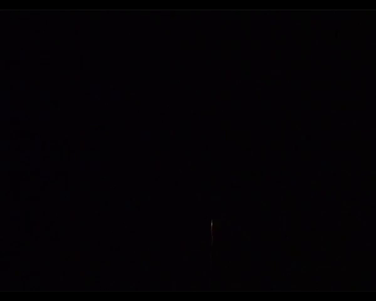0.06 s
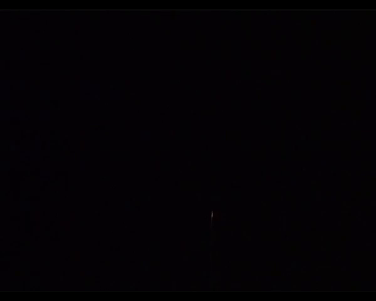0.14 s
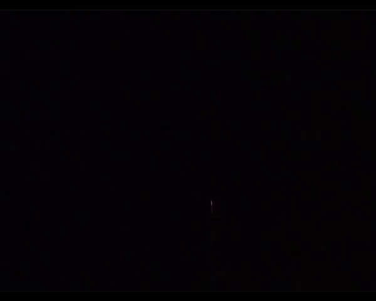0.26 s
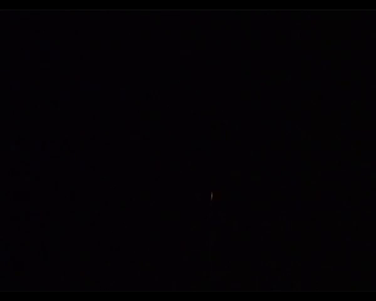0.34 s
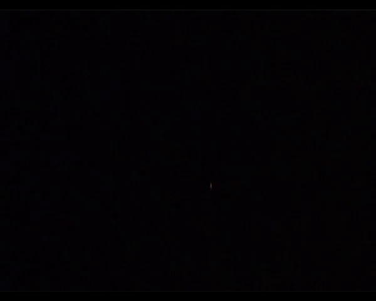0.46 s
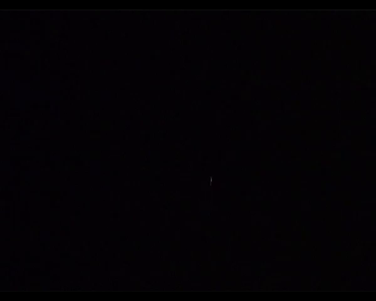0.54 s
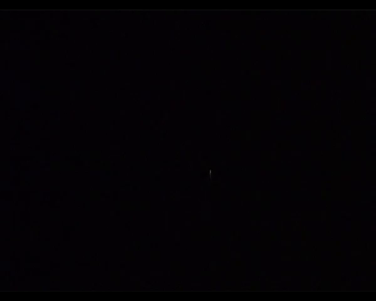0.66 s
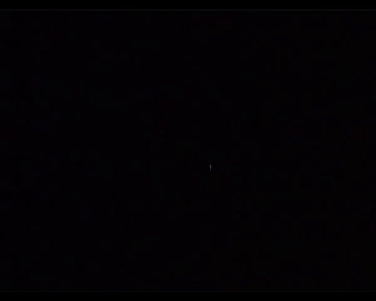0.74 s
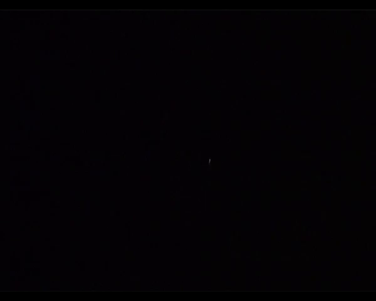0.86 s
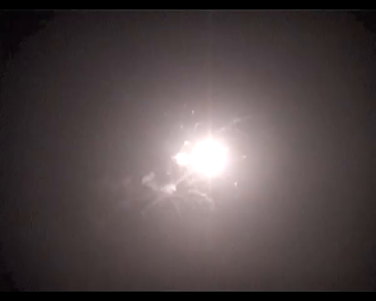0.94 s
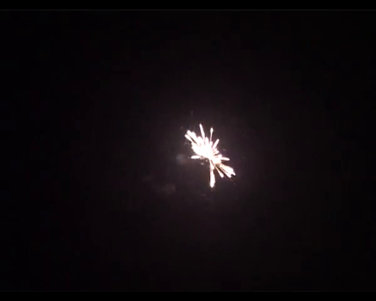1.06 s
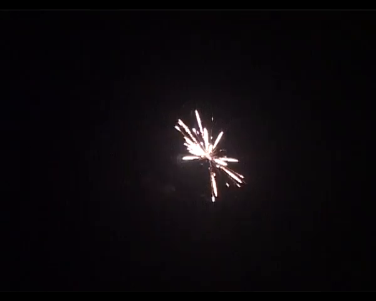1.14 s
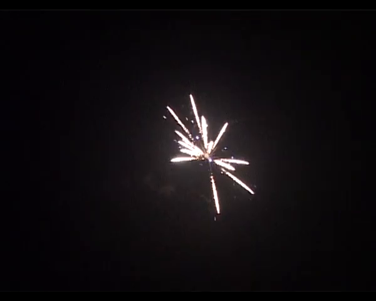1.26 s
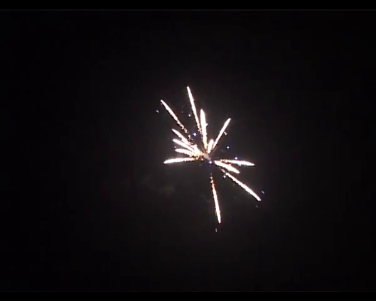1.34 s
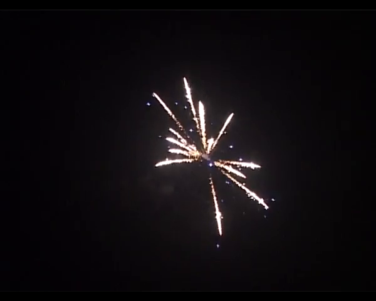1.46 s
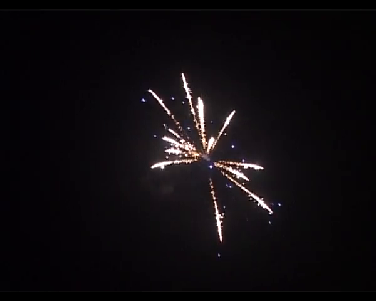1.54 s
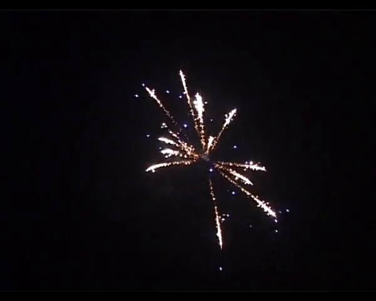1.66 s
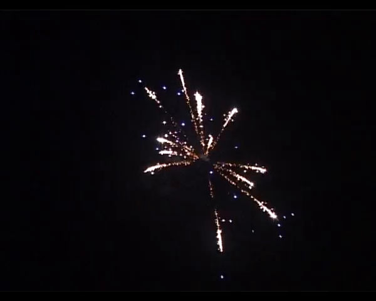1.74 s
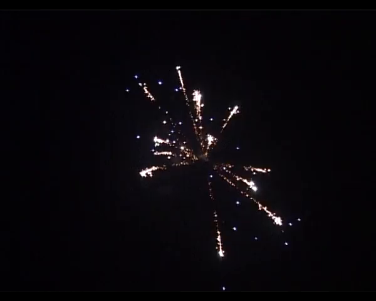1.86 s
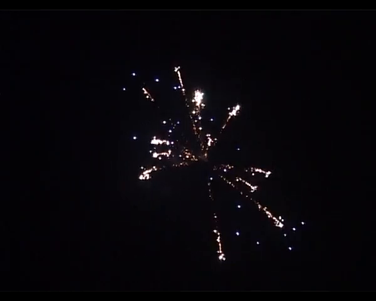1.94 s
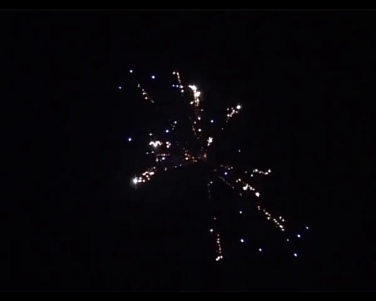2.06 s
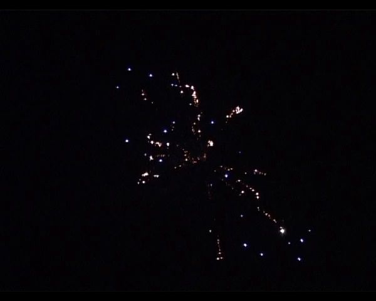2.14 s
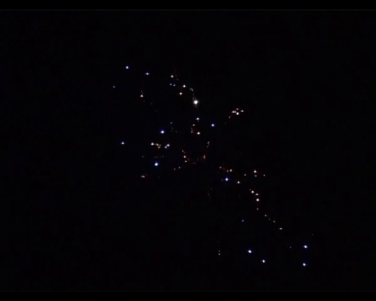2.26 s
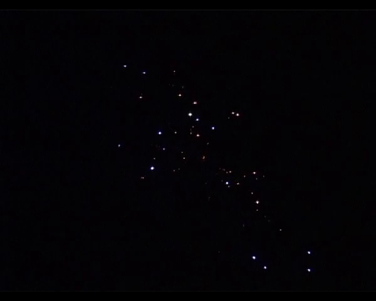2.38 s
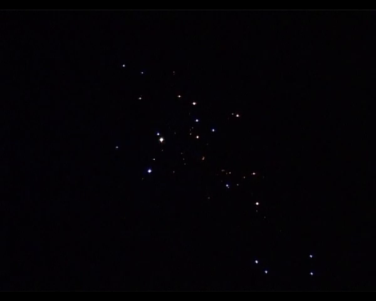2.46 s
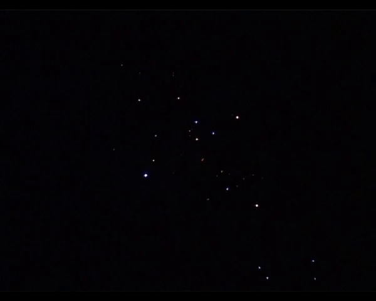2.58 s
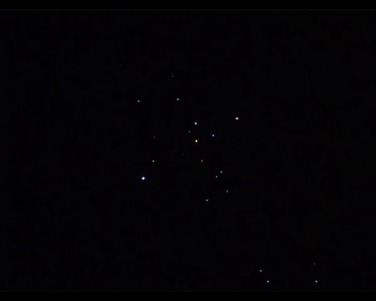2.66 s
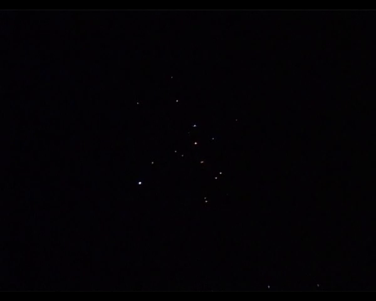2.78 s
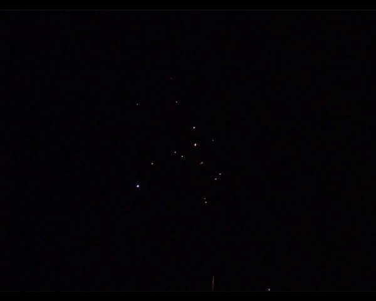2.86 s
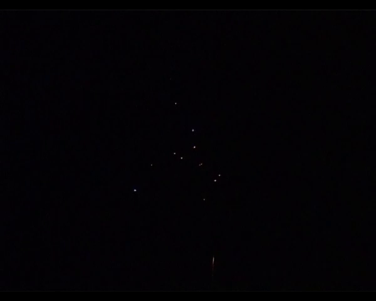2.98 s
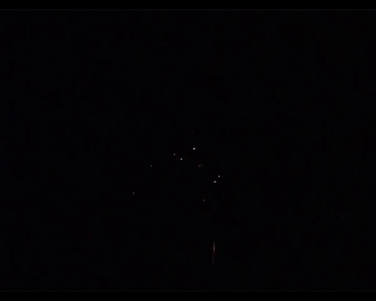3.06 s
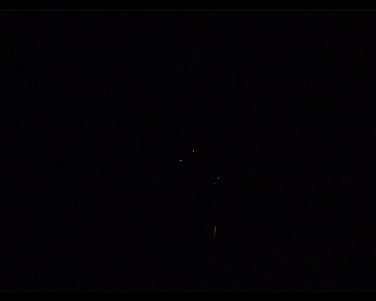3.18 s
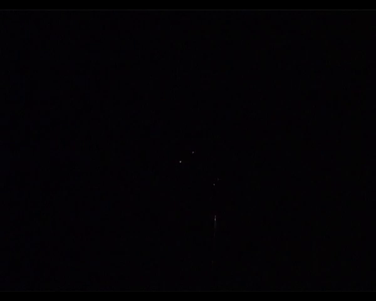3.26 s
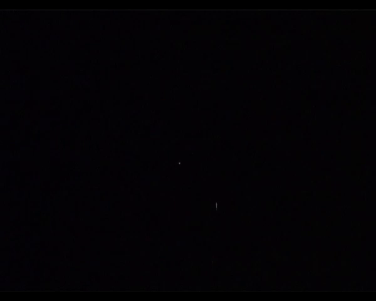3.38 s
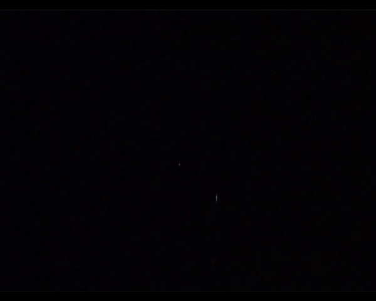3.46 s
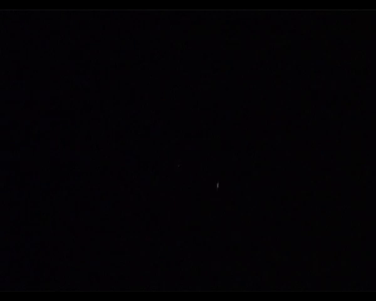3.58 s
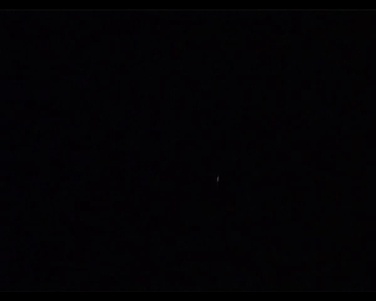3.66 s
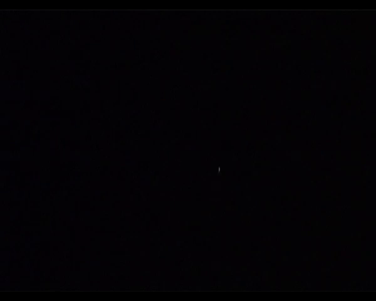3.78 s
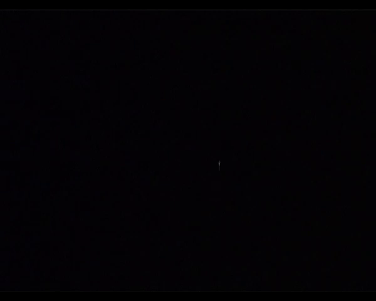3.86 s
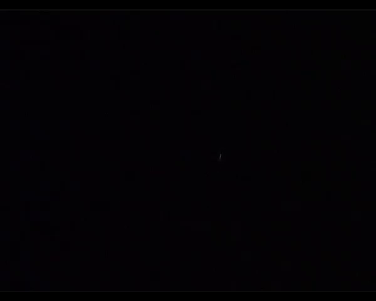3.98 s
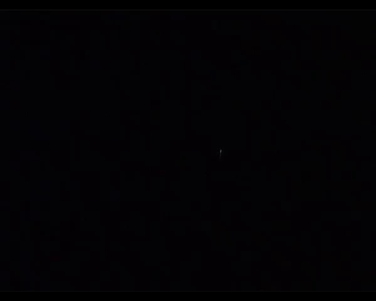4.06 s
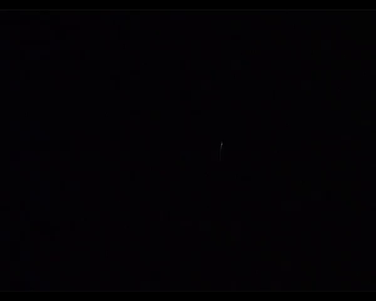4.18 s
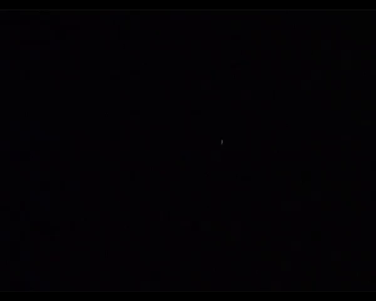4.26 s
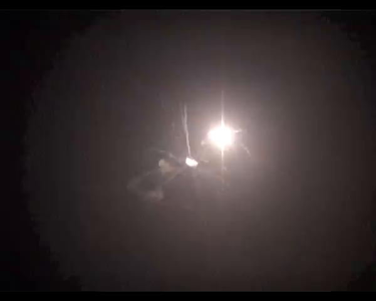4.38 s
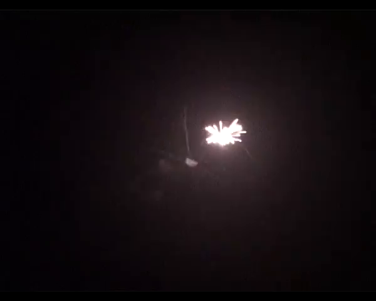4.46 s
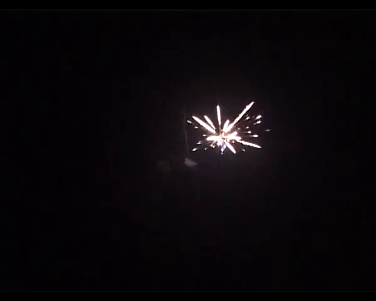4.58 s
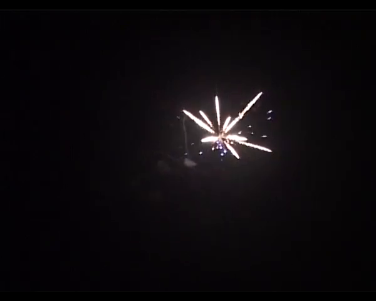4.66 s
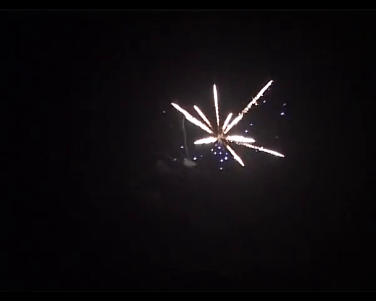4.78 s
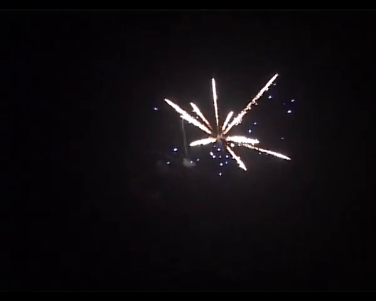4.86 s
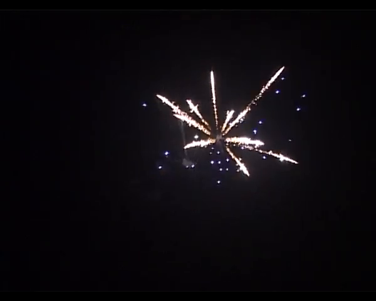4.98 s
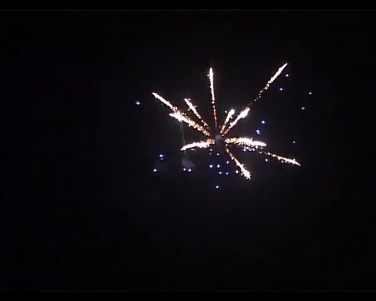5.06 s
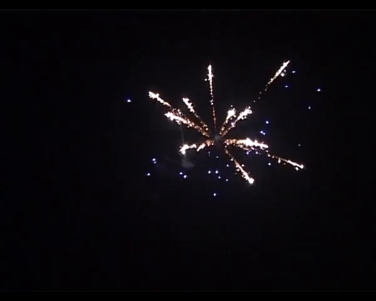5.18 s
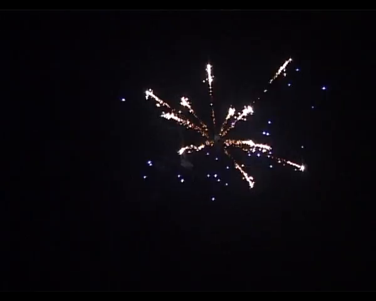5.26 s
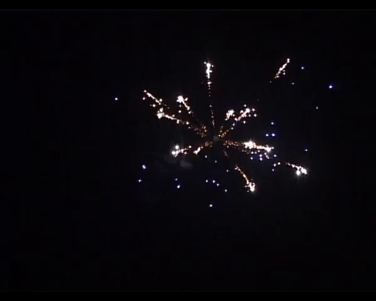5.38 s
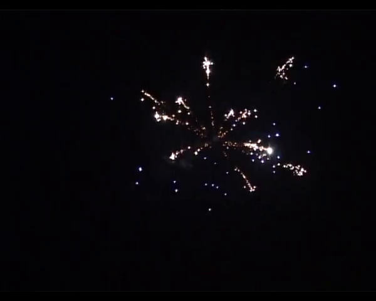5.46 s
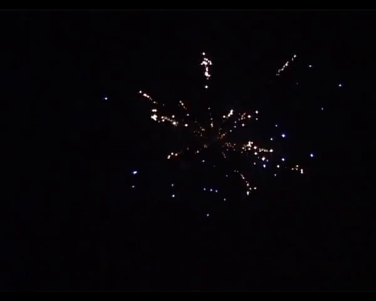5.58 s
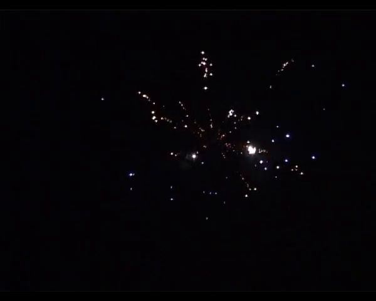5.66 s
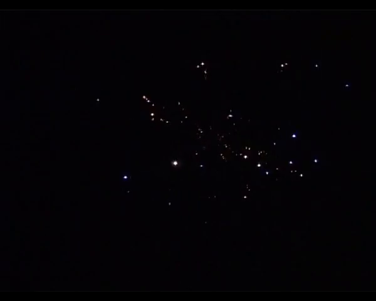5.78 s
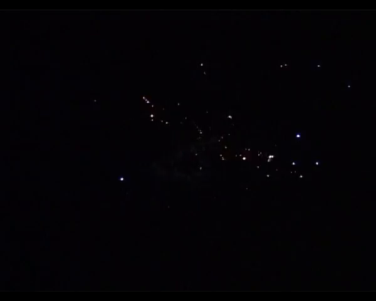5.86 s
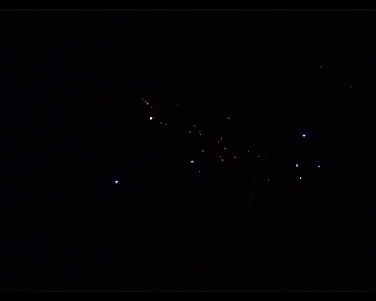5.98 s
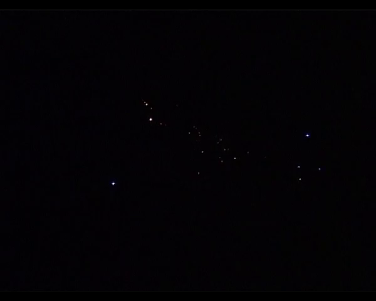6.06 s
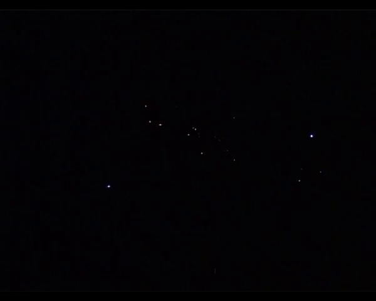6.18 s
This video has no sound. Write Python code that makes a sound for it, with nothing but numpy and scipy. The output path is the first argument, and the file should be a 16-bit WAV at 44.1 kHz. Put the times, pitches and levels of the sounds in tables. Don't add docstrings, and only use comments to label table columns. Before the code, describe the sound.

A quiet residential night opens with faint distant echo, soft hiss, barely audible far hum, light wind and thin crickets. At 1.3 s a firework shell bursts overhead: one hard, sharp, overloaded bang, with strong slaps off houses by 1.4 to 1.5 s and a rumbling tail. From about 1.65 s scattered pops thicken into a dense, bright crackle, full from 1.8 to 2.3 s, then break into single snaps until 2.55 s. At 2.6 s a launch charge gives a short, hollow thump, answered by a dull wall slap at 2.72 s and a soft distant swell around 3.5 s. Crickets chirp in quick pulses from 2.5 to 4.6 s, with tiny very high bat squeaks. At 4.76 s the second shell bangs, slaps and rolls; crackle swells from 5.15 s, densest 5.3 to 5.8 s. A second thump at 5.88 s and its wall return at 6.0 s mingle with the last pops, ending at 6.2 s.

```python
import sys
import numpy as np
from scipy import signal
from scipy.fft import rfft, irfft
from scipy.io import wavfile
from scipy.ndimage import uniform_filter1d

SR = 44100
rng = np.random.default_rng(int(sys.argv[2]) if len(sys.argv) > 2 else 0)


def to_wav(sig):
    pcm = np.clip(np.atleast_2d(sig), -1, 1) * 32767
    pcm = np.round(pcm).astype(np.int16)
    wavfile.write(sys.argv[1], SR, pcm.T)


def boost(x):
    u = np.asarray(x, float) / 20
    return 10 ** u


N = 274743


def add(out, s, x):
    i = int(s * SR)
    out[i:i + len(x)] += x[:N - i]


def shape(table, size):
    hz, db = np.transpose(table)
    return np.interp(np.log(np.arange(size // 2 + 1) * SR / size + 1), np.log(hz), db)


def noise(table, lo_hz, hi_hz):
    spec = rfft(rng.standard_normal(N)) * boost(shape(table, N))
    band = spec[int(lo_hz * N / SR):int(hi_hz * N / SR)]
    return irfft(spec, N) * N / np.sqrt(2 * np.sum(abs(band) ** 2))


def causal(table, size=1024):
    cep = irfft(np.log(boost(shape(table, size))), size)
    cep[1:size // 2] *= 2
    cep[size // 2 + 1:] = 0
    return irfft(np.exp(rfft(cep)), size)[:size // 2]


def walk(rate):
    k = int(SR / rate)
    held = np.repeat(rng.standard_normal(N // k + 1), k)
    return 1.1 * uniform_filter1d(held, k)[:N]


def high(x, hz, order):
    return signal.sosfilt(signal.cheby1(order, .5, hz, "high", fs=SR, output="sos"), x)


def dull(x, hz):
    return signal.sosfilt(signal.butter(3, hz, fs=SR, output="sos"), x)


# (frequency [Hz], level [dB])
POP_COLOUR = [(88, -46), (150, -39.5), (181, -24.5), (309, -2), (636, 1.5), (948, 0.5), (1440, -0.5),
              (1880, 1), (4600, 0), (5250, -4.5), (6110, -2), (8610, -17.5), (11400, -13.5), (12600, -26),
              (14100, -46)]


def bang(paths, push_s, sag, rise_s, cut_hz, drive, leak_hz, front, grit_db, grit_s):
    t = np.arange(2600) / SR
    arrivals = np.zeros(len(t))
    for s, share in [(0.00018, 1)] + paths:
        arrivals[int(s * SR)] += share
    wave = (1 - t / push_s) * np.exp(-sag * t / push_s) * (1 - np.exp(-t / rise_s))
    pressure = np.convolve(arrivals, wave)[:len(t)]
    body = np.tanh(drive * high(pressure, cut_hz, order=4))
    body = signal.sosfilt(signal.butter(1, leak_hz, "high", fs=SR, output="sos"), body)
    edge = front * np.sin(np.pi * np.minimum(t / 5e-4, 1))
    shock = np.convolve(arrivals * (arrivals > .5), edge)[:len(t)]
    pop = causal(POP_COLOUR)
    grit = boost(grit_db) * np.exp(-t / grit_s) * np.convolve(rng.standard_normal(len(t)), pop, "same")
    return body + shock + grit / np.sqrt(np.sum(pop ** 2))


# (time [s], ground echo delay [s], level [dB])
BURSTS = [
    (1.30655, .00475, -2.3),
    (4.76075, .0050, -2.3),
]
# (delay [s], share of the direct wave [1])
BURST_PATHS = [(.00224, .36), (.00814, .33)]


def burst():
    out = np.zeros(N)
    for s, ground_s, db in BURSTS:
        paths = BURST_PATHS + [(ground_s, .67)]
        wave = bang(paths, push_s=.00595, sag=.97, rise_s=.00029, cut_hz=212, drive=10.7, leak_hz=266,
                    front=.45, grit_db=-20.5, grit_s=.014)
        add(out, s, boost(db) * wave)
    return out


# (time [s], ground echo delay [s], level [dB])
LIFTS = [
    (2.60475, .0031, -1.6),
    (5.8831, .0028, -2.2),
]
# (delay [s], share of the direct wave [1])
LIFT_PATHS = [(.00181, -.28), (.00642, -.31)]
# (crack time [s], crack level [dB], thump time [s], thump level [dB])
WALL = [
    (2.7200, -10, 2.7294, -12.5),
    (5.9985, -10.5, 6.0082, -12.5),
]


def lift_charge():
    out = np.zeros(N)
    for (s, ground_s, db), (crack_s, crack_db, thump_s, thump_db) in zip(LIFTS, WALL):
        paths = LIFT_PATHS + [(ground_s, .81)]
        lift = bang(paths, push_s=.00586, sag=.225, rise_s=.00041, cut_hz=159, drive=3.5, leak_hz=70,
                    front=.1, grit_db=-20, grit_s=.006)
        t = np.arange(len(lift)) / SR
        lift = lift + .62 * np.sin(2 * np.pi * 930 * t) * np.exp(-t / .003)
        add(out, s, boost(db) * lift)
        scatter = .55 * rng.standard_normal(len(lift)) * np.exp(-t / .006)
        add(out, thump_s, boost(thump_db) * dull(dull(lift, 1300) + scatter, 4500))
        t = np.arange(400) / SR
        jitter = rng.standard_normal(400).cumsum() * .6
        ring = np.exp(-t / .002) * np.sin(2 * np.pi * 3700 * t + jitter)
        rattle = np.exp(-t / .00008) + .6 * ring
        add(out, crack_s, boost(crack_db) * dull(high(rattle, 400, order=1), 5500))
    return out


# (time [s], peak level [dB], pitch [Hz])
SLAPS = [(0.31, -45, 385), (.313, -35, 890), (.339, -42, 1400), (1.47, -10.5, 975), (2.83, -18.5, 1790),
         (4.931, -8.5, 940), (1.37, -15, 462), (1.391, -3, 395), (1.467, -2, 392), (2.491, -23.5, 353),
         (4.042, -28.5, 240), (4.829, -8, 295), (4.847, -1.5, 455), (4.884, -13, 520), (4.929, -2, 340),
         (5.01, -9, 496), (5.049, -17, 250)]


def slaps():
    out = np.zeros(N)
    for s, db, hz in SLAPS:
        t = np.arange(int(3.0 * SR / hz)) / SR
        add(out, s, -boost(db - 9.5) * np.sin(2 * np.pi * hz * t) * np.hanning(len(t)))
    return out


# (time alight [s], time of last dense crackle [s], level [dB])
STARS = [
    (1.83, 2.34, -35.5),
    (5.28, 5.8, -35),
]


def stars(t):
    shells = []
    for lit, end, _ in STARS:
        kindle_db, burn_out_db = 83.5 * (t - lit), 415 * (end - t)
        slopes = np.minimum(kindle_db, burn_out_db).clip(-80, 0)
        arch = np.minimum(((2 * t - lit - end) / (end - lit)) ** 2, 1)
        shells.append(slopes - 2 * arch)
    under = np.max(shells, axis=0)
    nearest = np.interp(t, [STARS[0][1], STARS[1][0]], [STARS[0][2], STARS[1][2]])
    return nearest + under, under


# (time [s], peak level [dB])
FIRST_SHELL_POPS = [(1.6344, -26), (1.6733, -28), (1.714, -23), (1.7294, -21), (1.7337, -20), (2.3598, -18),
                    (2.3672, -21), (2.3759, -16), (2.3926, -18), (2.4064, -20), (2.4093, -13),
                    (2.4149, -20), (2.4301, -28), (2.4361, -21), (2.4751, -24), (2.4796, -22),
                    (2.4906, -26), (2.4939, -24), (2.5125, -23), (2.5279, -23), (2.5449, -20)]
SECOND_SHELL_POPS = [(5.129, -25), (5.1397, -26), (5.1813, -23), (5.1853, -22), (5.1985, -23),
                     (5.8098, -19), (5.8166, -24), (5.8262, -22), (5.8351, -21), (5.8499, -22),
                     (5.8575, -23), (5.8673, -24), (5.8716, -20), (5.9043, -21), (5.9072, -18), (5.91, -23),
                     (5.9179, -23), (5.9205, -21), (5.93, -26), (5.9613, -13), (5.9773, -19), (5.9897, -23),
                     (6.0156, -21), (6.0437, -20), (6.054, -29), (6.0865, -29), (6.0933, -26),
                     (6.1465, -21), (6.1636, -33)]
# (time [s], peak level [dB])
EMBERS = [(2.627, -26), (2.652, -35), (2.768, -23.5), (2.787, -26), (2.922, -30.5), (2.967, -37),
          (2.99, -49)]


def lone_stars(pop):
    lone, embers = np.zeros(N), np.zeros(N)
    for s, peak_db in FIRST_SHELL_POPS + SECOND_SHELL_POPS:
        lone[int(s * SR)] = boost(peak_db + 2.5) / pop.max()
    for s, peak_db in EMBERS:
        embers[int(s * SR)] = boost(peak_db + 3.0) / pop.max()
    return 0.37 * dull(lone, 11000) + 0.64 * lone + high(dull(embers, 7000), 2000, order=2)


GROUND_LAGS_S = [.0043, .0047, .0050, .0054]


def crackle(db, rate):
    pop = causal(POP_COLOUR)
    when, strength, place = rng.random((N, 3)).T
    clusters = .75 * rate * boost(2.6 * walk(400))
    hits = (when < clusters / SR) * boost(-3.9 * np.log(strength + .02))
    band = signal.butter(3, [1800, 3800], "band", fs=SR, output="sos")
    power = uniform_filter1d(signal.sosfilt(band, np.convolve(hits, pop)[:N]) ** 2, size=2500)
    hits = boost(db) * hits / np.sqrt(power + 1e-9) * 0.84
    lone = lone_stars(pop)
    out, t = 0, np.arange(12000) / SR
    for k, lag_s in enumerate(GROUND_LAGS_S):
        mine = (place * len(GROUND_LAGS_S)).astype(int) == k
        part = np.convolve(hits * mine + lone * (k == 2), pop)[:N]
        lag = int(lag_s * SR)
        part[lag:] += .65 * uniform_filter1d(part, size=2)[:-lag]
        decay = boost(-20.5) * np.exp(-t / 0.0004) + boost(-49) * np.exp(-t / .02)
        wash = rng.standard_normal(len(t)) * decay * (t > 0)
        wash += dull(rng.standard_normal(len(t)), 8000) * boost(-51) * np.exp(-t / 0.21)
        out = out + part + boost(-3.0) * signal.fftconvolve(part, wash)[:N]
    return out


def echoes(t, s, groups, colour, gain_db=0):
    power = 0
    for delay, db, t60 in groups:
        age = np.maximum(t - s - delay, 0)
        build = 1 - np.exp(-age / (0.0056 + 0.041 * delay))
        power = power + (boost(db - 60 * age / t60) * build) ** 2
    return np.array([power * boost(gain_db + db + slope * np.clip(t - s, 0, 2)) ** 2 for db, slope in colour])


HILL_DB = [-80, -63, -61.5, -64.5]


def hill(t, s):
    delay_s, length_s = .83, .36
    swell = np.sin(np.pi * np.clip((t - s - delay_s) / length_s, 0, 1)).clip(0) ** 0.39
    return (boost(np.c_[HILL_DB]) * swell) ** 2


# (delay [s], level [dB], t60 [s])
BURST_ECHOES = [(.004, -16, 0.32), (0.06, -17, 0.4), (0.149, -27, 0.88), (.23, -30.5, 1.4),
                (.5, -42.5, 5.7)]
LIFT_ECHOES = [(.004, -25.5, 0.14), (0.051, -40, 1.53), (.12, -38.5, 0.48), (0.198, -39.5, 0.4),
               (.33, -44.5, 0.86), (.55, -54, 1.7)]
# (level [dB], change with travel [dB/s])
BURST_COLOUR = [(-21, -14.5), (1.06, -0.87), (-5.5, 1.5), (-8, -6.5)]
LIFT_COLOUR = [(-11.5, -14.5), (2.9, -11.9), (-8.5, 9.5), (-7.5, 6)]


def neighbourhood(t):
    earlier_s = -.62
    power = sum(echoes(t, s, BURST_ECHOES, BURST_COLOUR) for s, _, _ in BURSTS)
    power += sum(echoes(t, s, LIFT_ECHOES, LIFT_COLOUR) for s, _, _ in LIFTS)
    power += echoes(t, earlier_s, LIFT_ECHOES, LIFT_COLOUR, gain_db=-9)
    return power + sum(hill(t, s) for s in [earlier_s] + [row[0] for row in LIFTS])


# (frequency [Hz], level [dB])
BOOM = [(59, -39.5), (100, -10), (145, -26.5), (184, -3.5), (327, 1), (362, -1.5), (496, -2.5), (800, -12),
        (1040, -24), (1760, -120)]
MIDDLE = [(290, -23.5), (500, -9.5), (677, -9), (879, 0.5), (1050, 1), (1430, -10.5), (2200, -28),
          (2860, -59.5), (4840, -120)]
TREBLE = [(880, -27.5), (1500, 2.5), (2440, -0.5), (3730, -5.5), (4290, -4.5), (6180, -10.5), (8580, -25),
          (11600, -25.5), (12600, -44.5), (13000, -78), (14100, -80)]


def roll(power, stars_db):
    _, boom, middle, top = np.sqrt(power)
    lumps = boost(1.3 * walk(70))
    out = boom * noise(BOOM, 170, 850) + middle * noise(MIDDLE, 660, 1800)
    treble = noise(TREBLE, 1600, 5600)
    far = np.clip((-46 - 10 * np.log10(power[3] + boost(stars_db) ** 2)) / 22, 0, .9)
    treble = boost(1.8 * walk(220)) * ((1 - far) * treble + far * dull(treble, 4500))
    return lumps * (out + top * treble)


def chirp(hz, fall_hz, length_s):
    t = np.arange(int(length_s * SR)) / SR
    phase = 2 * np.pi * (hz * t - fall_hz * t ** 2 / (2 * length_s))
    return np.sin(phase) * signal.windows.tukey(len(t), .45)


# (first stroke [s], last stroke [s], first level [dB], swell [dB per stroke])
CRICKET = [(0.936, 1.287, -59.5, 2.1), (2.528, 2.853, -33, 1.1), (3.139, 3.462, -54, 2.5),
           (3.772, 3.774, -52.5, 0), (3.864, 4.142, -49.5, 1.5), (4.378, 4.61, -54, 3),
           (6.186, 6.187, -37, 9)]


def strokes():
    stroke_s, full_db = .0455, -47.5
    rows = []
    for first, last, db, swell_db in CRICKET:
        for k, s in enumerate(np.linspace(first, last, round((last - first) / stroke_s) + 1)):
            level = min(db + k * swell_db, full_db)
            hz = max(4320 + 26 * (level - full_db), 4185)
            rows.append((s, level, hz))
    return rows


# (time [s], peak level [dB], pitch [Hz])
FAR_CRICKET = [(.23, -72, 3600), (.28, -68, 3600), (.33, -66, 3600), (.38, -66, 3600), (.425, -67, 3600),
               (.695, -66, 3600), (.745, -64, 3600), (.80, -65, 3600), (1.08, -67, 3600), (1.13, -66, 3600),
               (1.185, -65, 3600)]
# (start [s], end [s], pitch
# [Hz], throb rate [1/s], level [dB])
TRILLS = [(0, 6.23, 2530, 26, -79), (4.4, 4.76, 2280, 26, -76), (2.9, 4.76, 4300, 22, -84),
          (1.03, 1.3, 5700, 11, -85)]


def insects(t):
    out = np.zeros(N)
    for s, db, hz in strokes():
        db = db + .6 * rng.standard_normal()
        hz = hz + 8 * rng.standard_normal()
        add(out, s, boost(db) * chirp(hz + 80, 170, 0.024))
        add(out, s + .021, boost(db - 15) * chirp(hz + 80, 170, .022))
    ring = np.arange(12000) / SR
    tail = rng.standard_normal(len(ring)) * np.exp(-ring / 0.068)
    out += boost(-45) * signal.fftconvolve(out, tail)[:N]
    for s, db, hz in FAR_CRICKET:
        add(out, s, boost(db - 4) * chirp(hz + 600, 800, .028))
        add(out, s + .018, boost(db - 11) * chirp(hz + 600, 800, .028))
    for s0, s1, hz, rate, db in TRILLS:
        tone = noise([(hz - 300, -40), (hz - 60, 0), (hz + 60, 0), (hz + 300, -40)], 100, 9000)
        throb = (1 + np.sin(2 * np.pi * rate * t + walk(3))) ** 2 / 2
        out += boost(db) * tone * (t > s0) * (t < s1) * throb
    return out


# (time [s], peak level [dB], start pitch [Hz])
BAT = [(0.07, -59, 12400), (0.101, -56, 12800), (.814, -72, 11200), (0.89, -43.5, 14200),
       (1.949, -46, 13300), (2.888, -45, 14000), (3.552, -60, 12300), (3.597, -55, 12800),
       (3.626, -50.5, 13500), (4.165, -45.5, 13900), (4.373, -59.5, 12550), (5.153, -46, 13530),
       (5.896, -45, 13600)]


def bat():
    out = np.zeros(N)
    for s, db, hz in BAT:
        squeak = chirp(hz, hz - 9600, .011)
        add(out, s, boost(db) * squeak)
        add(out, s + .0055, boost(db - 10) * squeak)
    t = np.arange(4000) / SR
    leaves = rng.standard_normal(len(t)) * np.exp(-t / 0.017) * (t > .008)
    return out + boost(-27.5) * signal.fftconvolve(out, leaves)[:N]


# (time [s], level [dB])
GUST = [(0, -62.5), (.3, -71), (.6, -68), (.9, -64.5), (1.3, -68.5), (1.8, -54), (1.95, -64), (2.4, -71),
        (2.6, -50), (3.2, -63.5), (3.85, -65.5), (4, -55.5), (4.1, -60), (4.3, -67.5), (4.75, -73),
        (5.2, -50), (5.35, -58.5), (6.23, -59)]
RUSTLE_DB = [-3.3, -1.5, -11, -11]
NIGHT_DB = [-96.5, -76, -74, -81.5]


def moving_air(t):
    gust_db = np.interp(t, *np.transpose(GUST))
    return boost(gust_db + np.c_[RUSTLE_DB]) ** 2 + boost(np.c_[NIGHT_DB]) ** 2


# (frequency [Hz], level [dB])
WIND_COLOUR = [(8.8, -40.5), (15, -18), (27, -13.5), (44, -6.5), (59, 5.5), (102, 2), (144, -4.5),
               (170, -13), (220, -32.5), (370, -120)]


def wind(power):
    return np.sqrt(power[0]) * noise(WIND_COLOUR, 20, 140)


def hum(t):
    return boost(-69 + 1.5 * walk(6)) * np.sin(2 * np.pi * 62.6 * t + .8 * walk(6.8))


# (frequency [Hz], level [dB])
HISS_COLOUR = [(2060, -11.5), (3500, -14), (3670, -6.5), (4380, -9.5), (6430, -8.5), (7680, -2.5),
               (9710, -29.5), (10100, -31.5), (11000, -42), (14300, -70.5), (22000, -120)]


def hiss():
    return boost(-79 + .8 * walk(36)) * noise(HISS_COLOUR, 5600, 9000)


# (frequency [Hz], level [dB])
APART = [(60, -17), (110, -24.5), (200, -33.5), (370, -40), (670, -35.5), (1220, -33), (2240, -24),
         (4090, -21.5), (7470, -21), (13700, -15.5)]


def microphones(mid, shots, rumble):
    blur = rng.standard_normal(600) * np.exp(-np.arange(600) / 150)
    blur = irfft(rfft(blur) / abs(rfft(blur)))
    side = signal.fftconvolve(mid + 0.83 * shots, np.convolve(blur, causal(APART)))[:N]
    sag = -signal.sosfilt(signal.butter(1, [12, 40], "band", fs=SR, output="sos"), shots ** 2)
    left = mid + side + boost(-1) * rumble + .5 * sag
    right = mid - side + boost(-2.5) * rumble + .1 * sag
    return np.array([left, right])


def scene():
    t = np.arange(N) / SR
    stars_db, under_db = stars(t)
    power = moving_air(t) + neighbourhood(t)
    power[1] += boost(stars_db - 15) ** 2
    power[2] += boost(stars_db - 5 - 6.5) ** 2
    power[3] += boost(stars_db) ** 2 * (1 - .96)
    shots = burst() + lift_charge() + slaps()
    pops_per_s = 1050 * boost(.8 * np.maximum(under_db, -15))
    mid = roll(power, stars_db) + crackle(stars_db, pops_per_s)
    ceiling = signal.ellip(8, .2, 60, 12100, fs=SR, output="sos")
    mid = shots + signal.sosfilt(ceiling, mid)
    mid += insects(t) + bat() + hum(t) + hiss()
    return microphones(mid, shots, wind(power))


def low_pass(x):
    return signal.sosfilt(signal.butter(12, 14260, fs=SR, output="sos"), x)


def record(dry):
    mix = dull(np.clip(dry, -1, 1), 12500)
    return low_pass(mix)


dry = scene()
out = record(dry)
to_wav(out)
```